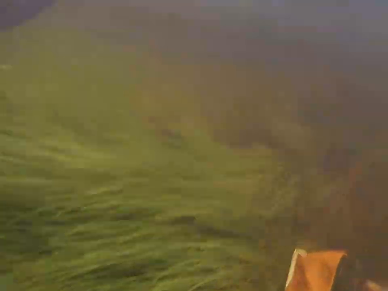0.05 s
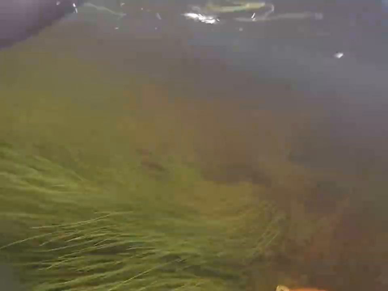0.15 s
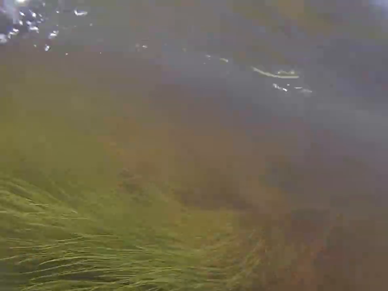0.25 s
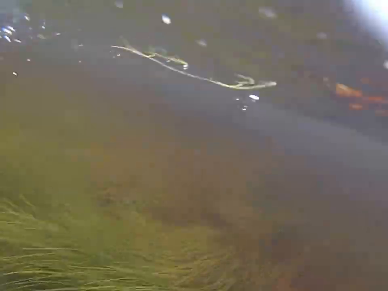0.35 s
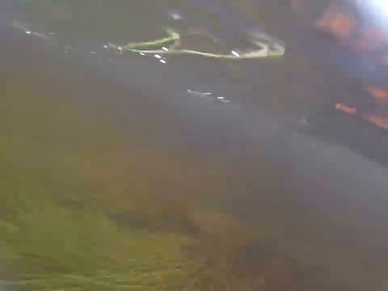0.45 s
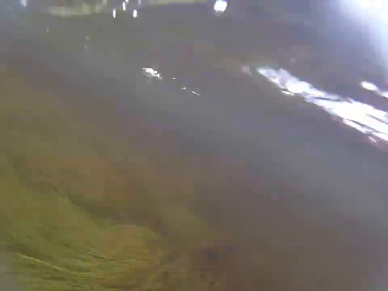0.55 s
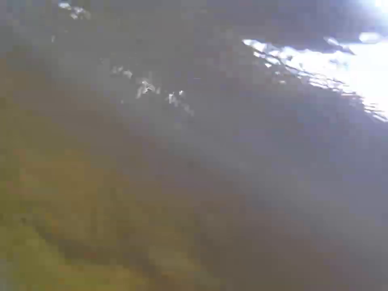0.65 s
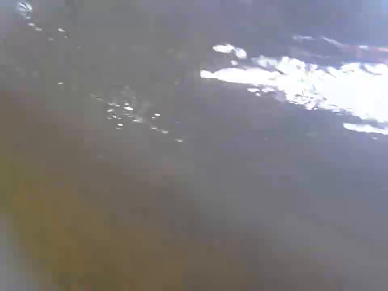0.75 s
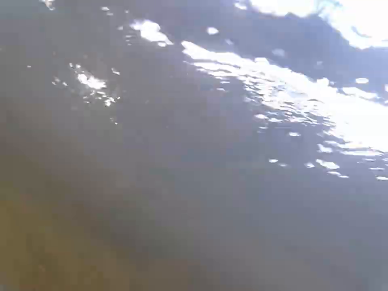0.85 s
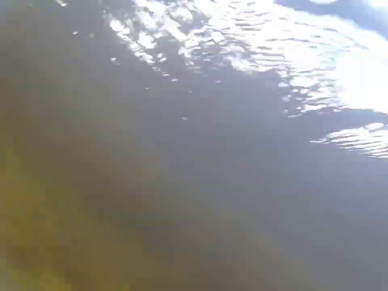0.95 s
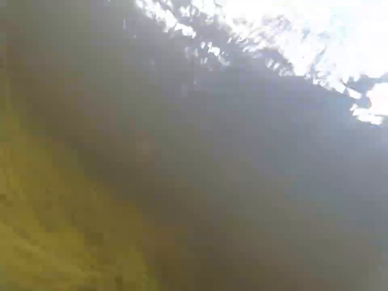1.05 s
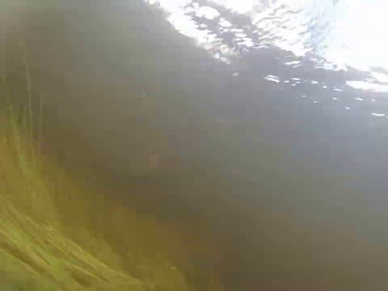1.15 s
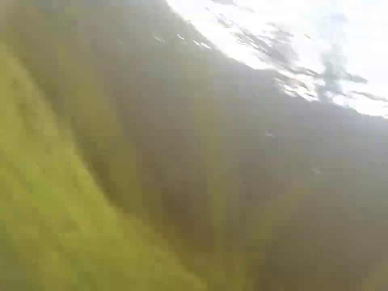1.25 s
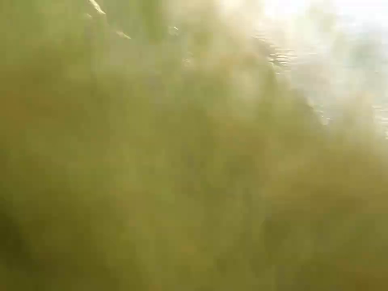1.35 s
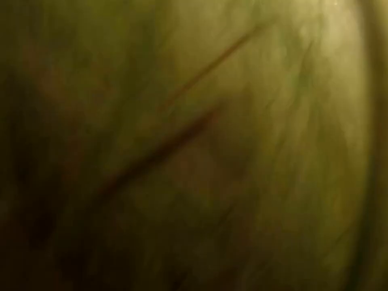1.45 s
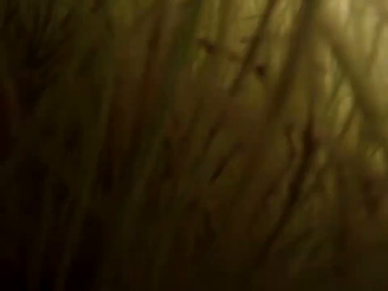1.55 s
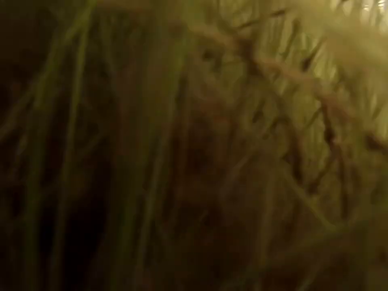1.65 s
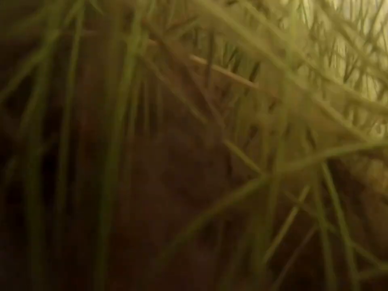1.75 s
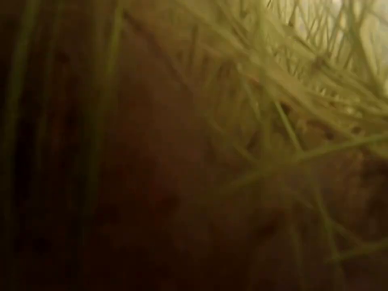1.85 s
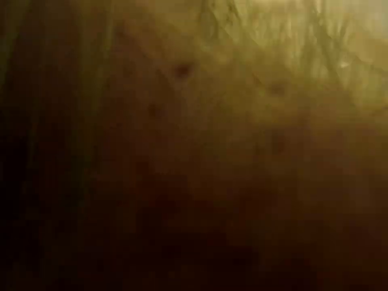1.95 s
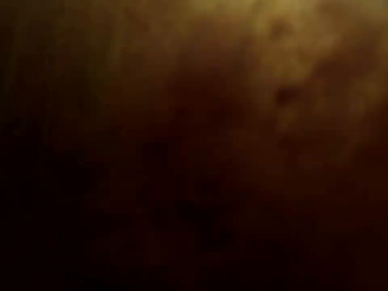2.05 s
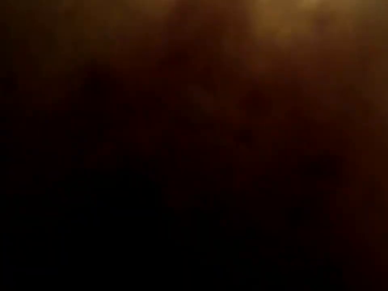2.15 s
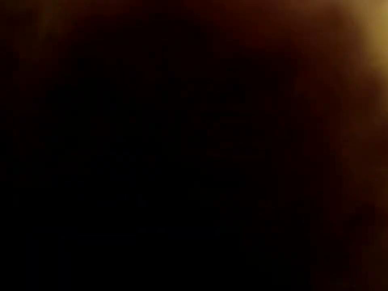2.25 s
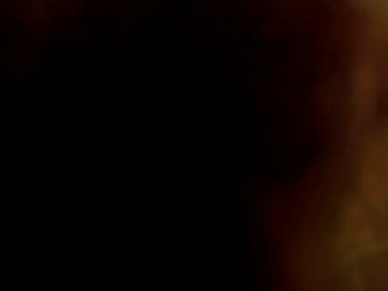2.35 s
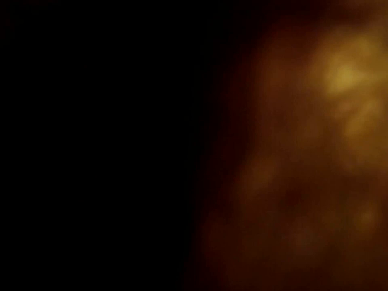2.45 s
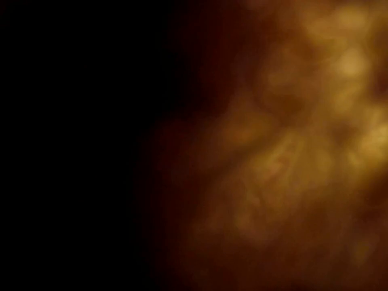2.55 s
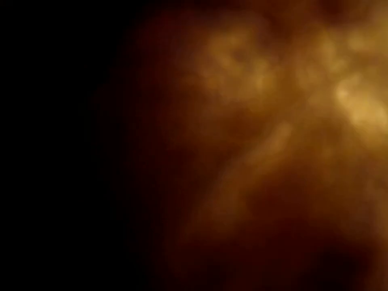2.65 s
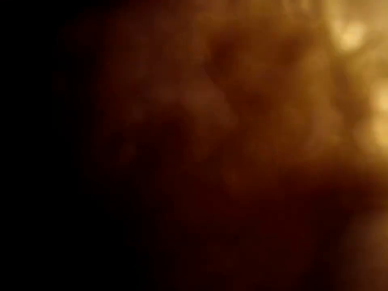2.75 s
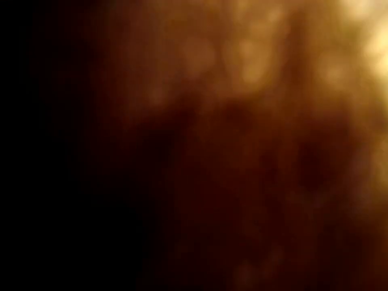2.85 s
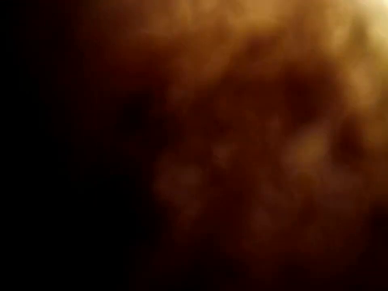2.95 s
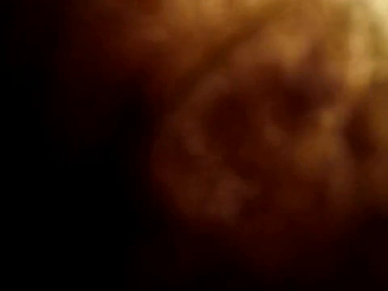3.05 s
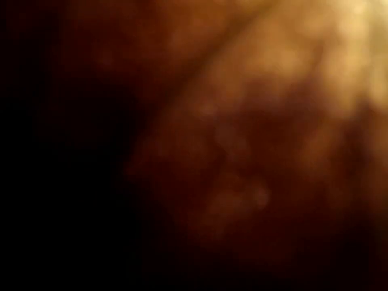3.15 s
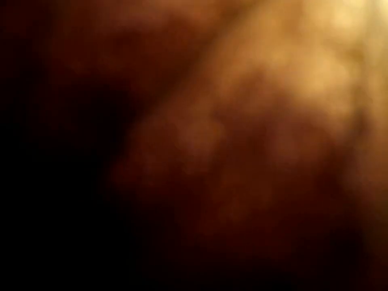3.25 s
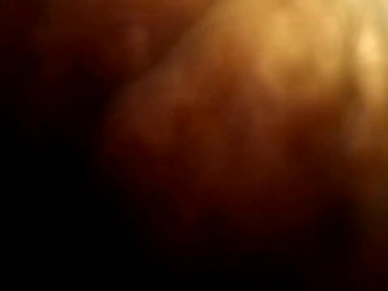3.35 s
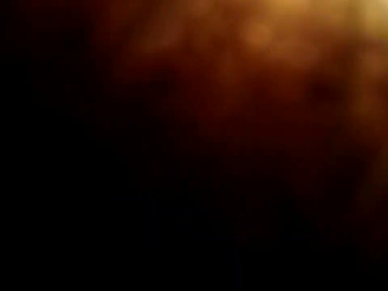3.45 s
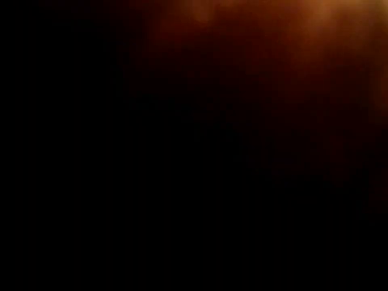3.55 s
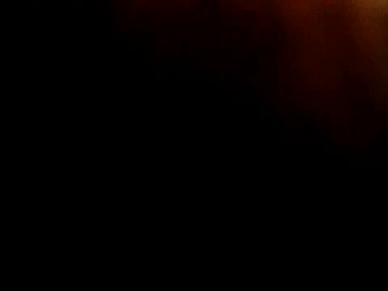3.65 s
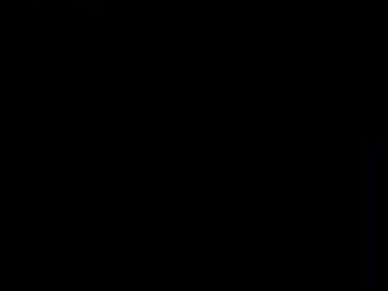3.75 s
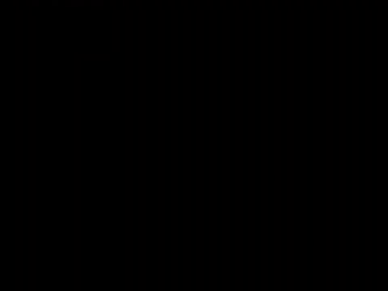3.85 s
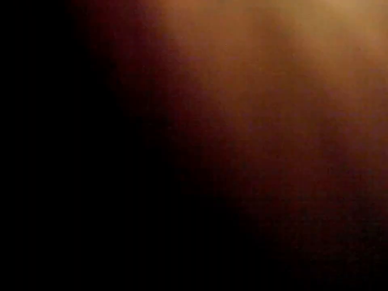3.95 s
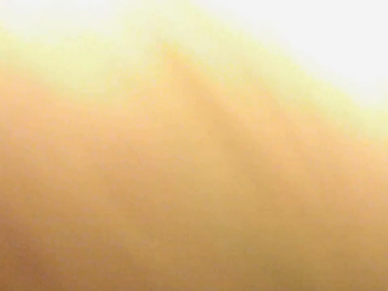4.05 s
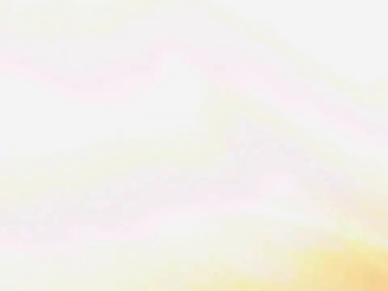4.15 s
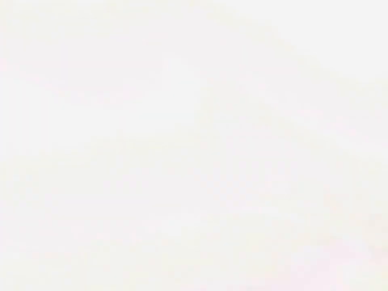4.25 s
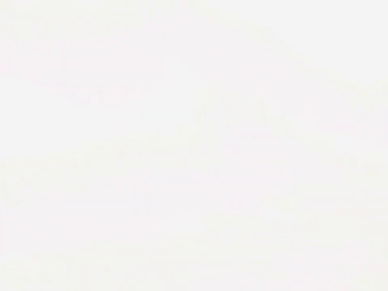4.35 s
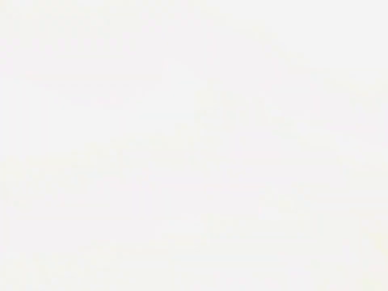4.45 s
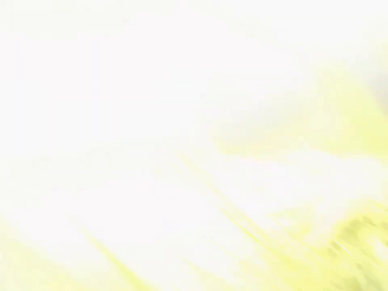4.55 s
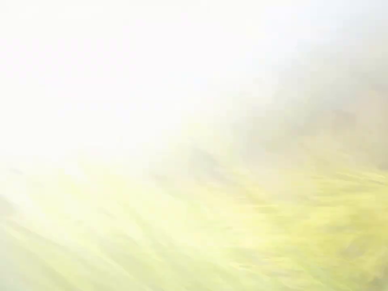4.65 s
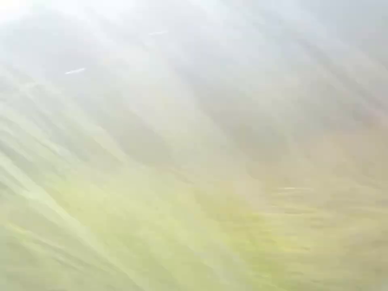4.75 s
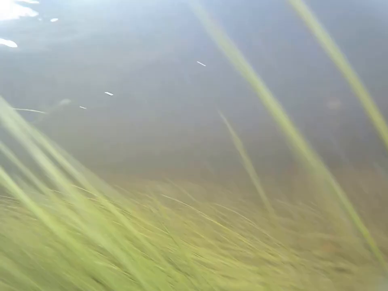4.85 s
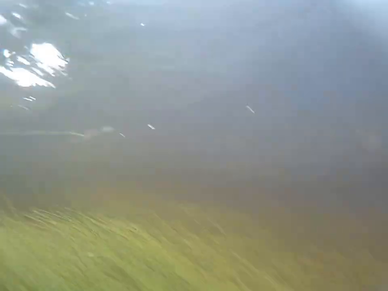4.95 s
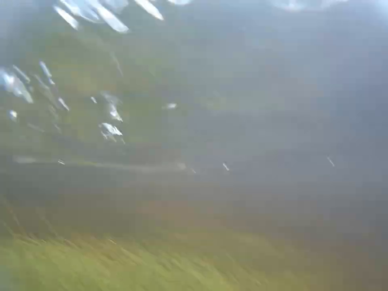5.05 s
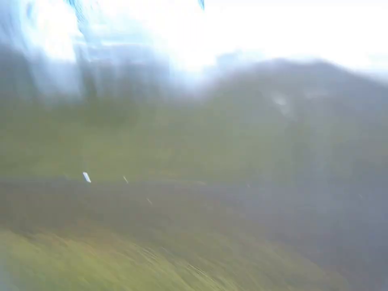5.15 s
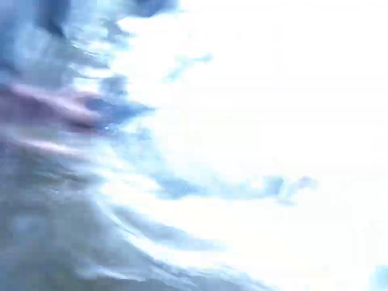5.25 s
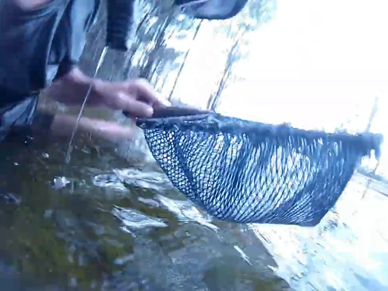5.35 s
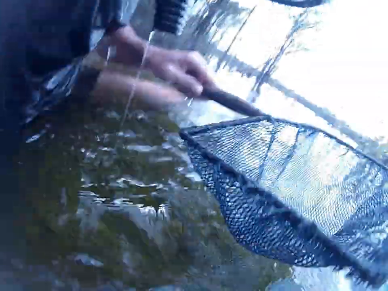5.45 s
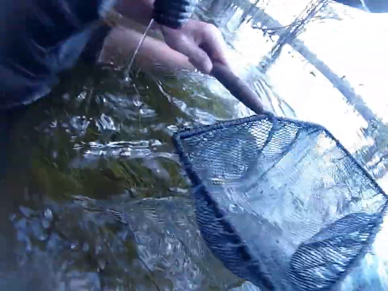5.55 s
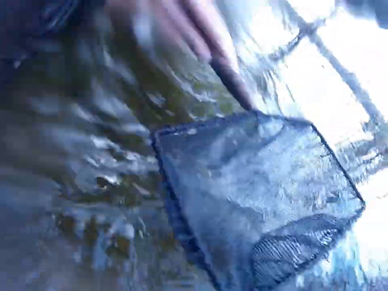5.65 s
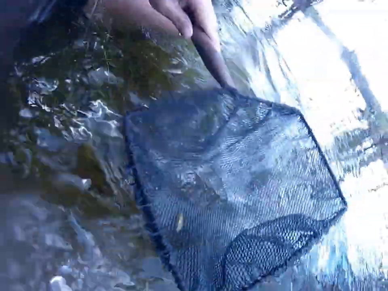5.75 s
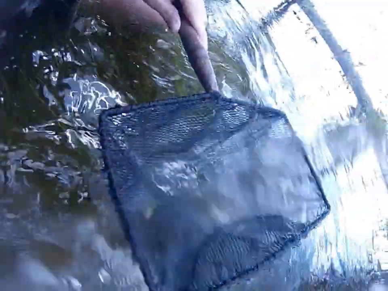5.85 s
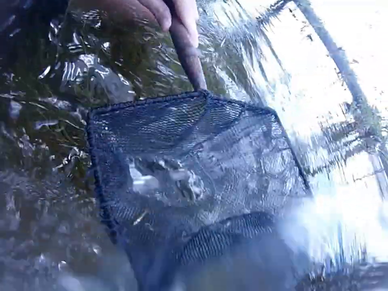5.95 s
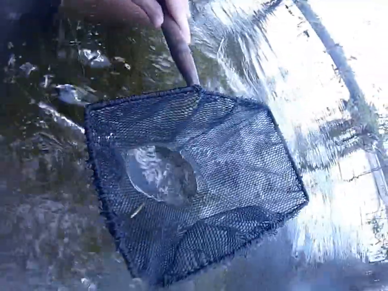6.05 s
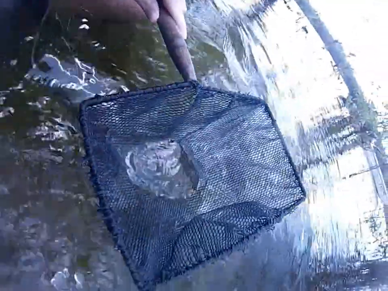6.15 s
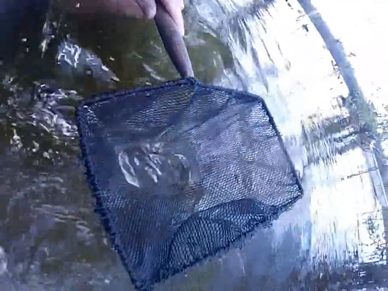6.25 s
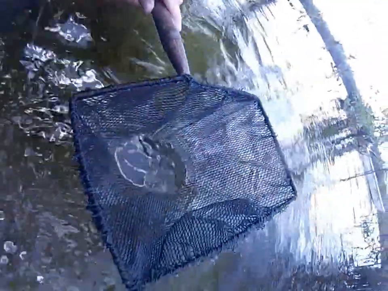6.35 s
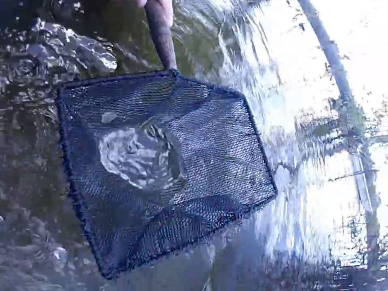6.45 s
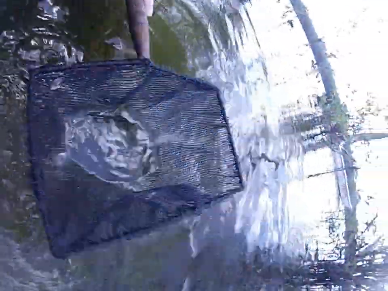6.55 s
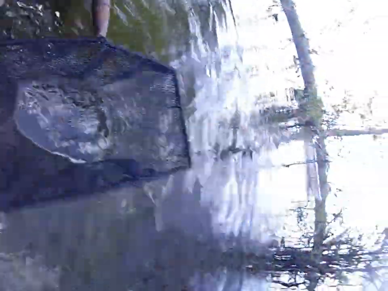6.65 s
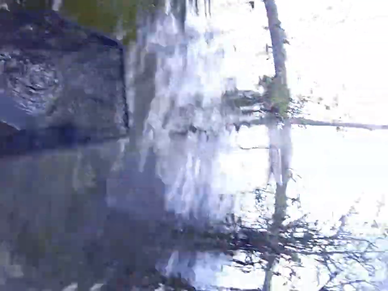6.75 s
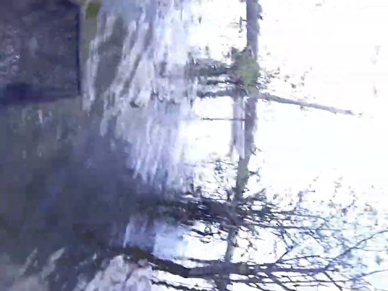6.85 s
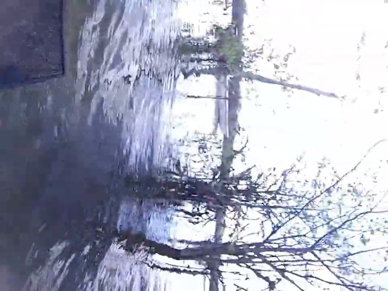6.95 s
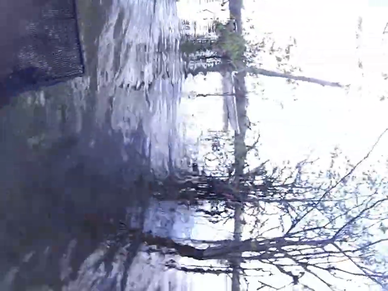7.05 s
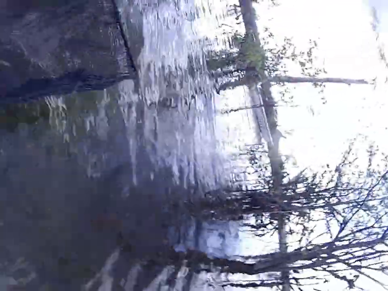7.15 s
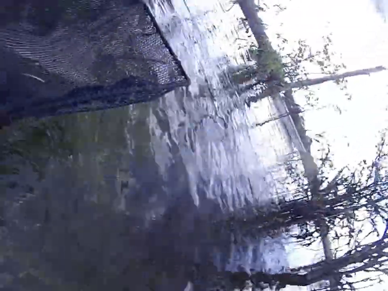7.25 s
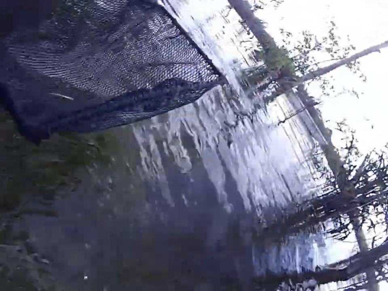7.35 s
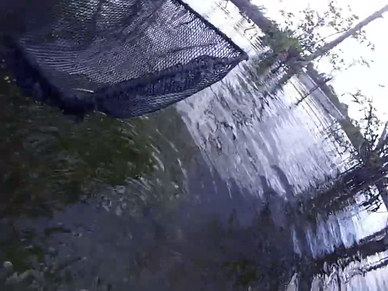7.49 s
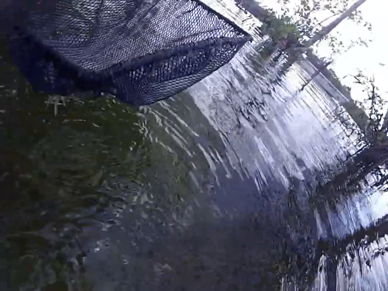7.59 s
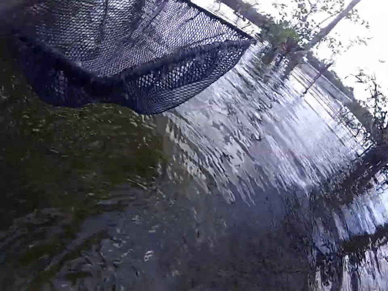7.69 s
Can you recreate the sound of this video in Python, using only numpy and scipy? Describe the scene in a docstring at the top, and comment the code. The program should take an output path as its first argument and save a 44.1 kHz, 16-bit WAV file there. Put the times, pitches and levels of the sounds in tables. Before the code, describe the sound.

A cased microphone gurgles loudly through stream water, rustles quietly among weeds, surfaces with thumps, then gets rubbed and sharply knocked while water drips.

```python
"""Cased camera in a stream

A camera in a waterproof case is pushed through a stream beside a hand net, then lifted out.
Under water, ringing sines make bubbles, dense swarms make gulps, and rough noise makes weed and fingers.
In the air, fingers rub the case and blows ring its shell, crack and thud; the net drips, electronics tick.
The closed case makes all this mono at the microphone, which the hardest knocks and bubbles overload."""
import sys
import numpy as np
from scipy import signal
from scipy.fft import rfft, irfft, next_fast_len
from scipy.io import wavfile
from scipy.ndimage import uniform_filter1d

SR = 44100
rng = np.random.default_rng(int(sys.argv[2]) if len(sys.argv) > 2 else 0)


def put_to_file(sound):
    """Save the sound as 16-bit audio at rate SR, in the file named by the first command-line argument."""
    columns = np.atleast_2d(sound).T  # one column per channel
    safe = np.clip(columns, -1, 1)
    whole_steps = np.round(safe * 32767)
    wavfile.write(sys.argv[1], SR, whole_steps.astype(np.int16))


N = 340452
TIME = np.arange(N) / SR


def from_db(db):
    """Amplitude ratio of a level in dB."""
    return 10 ** (np.asarray(db) / 20)


def rms_one(x):
    """Scale to an rms of 1."""
    return x / np.sqrt(np.mean(x ** 2) + 1e-20)


def evened(x, window_s):
    """Hold the short-term level of a texture near 1."""
    return x / np.sqrt(uniform_filter1d(x ** 2, int(window_s * SR)) + 1e-4)


def level(rows):
    """Gain that follows rows of (t/s, level/dB), silent outside them."""
    rows = np.array(rows)
    return from_db(np.interp(TIME, rows[:, 0], rows[:, 1], left=-150, right=-150))


def swells(rows, attack_s, release_s):
    """Gain of events (start, length, dB) that rise, hold and die away; overlaps add in power."""
    power = np.zeros(N)
    for s, length, db in rows:
        away = np.maximum((s - TIME) / attack_s, (TIME - s - length) / release_s)
        power += (from_db(db) * np.exp(-np.clip(away, 0, 20))) ** 2
    return np.sqrt(power)


def at_hz(points, hz):
    """Read a spectrum on a log-frequency axis."""
    points = np.array(points)
    return np.interp(np.log(hz), np.log(points[:, 0]), points[:, 1])


def low_pass(x, hz, order=2):
    """Butterworth low-pass."""
    return signal.sosfilt(signal.butter(order, hz, "low", fs=SR, output="sos"), x + 1e-18)


def add(out, s, sound):
    """Mix a sound in from time s."""
    start = max(int(s * SR), 0)
    out[start:start + len(sound)] += sound[:max(N - start, 0)]


def drift(rate):
    """Random wander with spread 1, through a new chance value rate times a second."""
    knots = rng.standard_normal(4000)
    return rms_one(np.interp(TIME * rate, np.arange(len(knots)), knots))


def coloured(x, spectrum):
    """Give x a spectrum that falls away steeply beyond its ends; rms 1."""
    size = next_fast_len(N)
    hz = np.maximum(np.arange(size // 2 + 1) * SR / size, 1)
    low_skirt = np.minimum(hz / spectrum[0][0], 1) ** 4
    high_skirt = np.minimum(spectrum[-1][0] / hz, 1) ** 4
    gain = from_db(at_hz(spectrum, hz)) * low_skirt * high_skirt
    return rms_one(irfft(rfft(x, size) * gain, size)[:N])


def friction(spectrum, grain_db, flutter_db):
    """Countless tiny slips of uneven size, coming in flurries."""
    grains = np.repeat(rng.standard_normal(N // 16 + 1), 16)[:N]
    slips = rng.standard_normal(N) * from_db(grain_db * grains)
    return coloured(slips * from_db(flutter_db * drift(120)), spectrum)


def ring(clicks, hz, t60):
    """A unit click sets a sine of height 1 ringing."""
    r = from_db(-60 / (t60 * SR))
    w = 2 * np.pi * hz / SR
    return signal.lfilter([0, np.sin(w)], [1, -2 * r * np.cos(w), r * r], clicks + 1e-18)


def swarm(colour, per_s, cycles, spread_db, count=40):
    """Random pulses, each swelling quickly and ringing some cycles at one of count pitches; rms 1."""
    born = rng.random(N) < per_s / SR
    uneven = from_db(spread_db * np.minimum(rng.exponential(1, N), 2))
    sizes = born * uneven * rng.choice([-1, 1], N)
    dealt = rng.integers(0, count, N)
    out = np.zeros(N)
    for k, hz in enumerate(np.geomspace(colour[0][0], colour[-1][0], count)):
        onset = ring(sizes * (dealt == k), hz, 3 / hz)
        out += from_db(at_hz(colour, hz)) * hz ** 2 * ring(onset, hz, cycles / hz)
    return rms_one(out)


def hiss_pair():
    """A trace of independent steady noise in each channel."""
    spectrum = [(20, 24), (100, 11), (400, 0.0), (2500, -3.0), (7000, 0), (14000, -9)]  # f/Hz, level/dB
    return from_db(-73) * np.array([coloured(rng.standard_normal(N), spectrum) for side in "LR"])


def stream():
    """Steady noise of the stream, weaker towards the treble."""
    # spectrum of the flow: f/Hz, relative level/dB
    stream_spectrum = [(80, 4), (150, -8.5), (330, -7.5), (640, -11.5), (1000, -14.5), (1400, -17),
                       (2200, -20.5), (3700, -24.5), (7000, -29.5), (12300, -35.5), (16000, -36.5)]
    return from_db(-56.5) * coloured(rng.standard_normal(N), stream_spectrum)


def ticks(tick_db=-35, width_s=0.00159, edge_hz=2500):
    """The camera's radio draws current in short square bursts, about ten a second."""
    start_s, period_s = 7.0555, .1024
    gate = ((TIME - start_s) % period_s < width_s) & (TIME > start_s)
    return -from_db(tick_db) * low_pass(1.0 * gate, edge_hz, order=1)


def buffeting(trim_db=0.5):
    """Flow and handling buffet the case: low rumble of uneven strength."""
    # strength of the buffeting, before the trim: t/s, level/dB
    buffet_rows = [(0.0, -45), (0.13, -37.5), (0.36, -44.5), (0.97, -23.5), (1.48, -30), (1.57, -22.5),
                   (1.63, -39), (3.83, -33.5), (3.98, -23), (4.62, -39.5), (5.12, -45.5), (5.27, -24.5),
                   (5.7, -30.5), (5.78, -39.5), (6.04, -33), (7.01, -34), (7.1, -43.5), (7.72, -58.5)]
    # spectrum of the rumble: f/Hz, relative level/dB
    rumble_spectrum = [(12, -10.5), (20, 1), (30, -4.5), (50, -13.5), (80, -24), (140, -27), (250, -37),
                       (500, -65.5)]
    rumble = evened(coloured(rng.standard_normal(N), rumble_spectrum), window_s=0.034)
    return from_db(trim_db) * level(buffet_rows) * rumble


def trickle():
    """A thin swarm of small bubbles and drips, each a short ring."""
    # strength of the trickle: t/s, level/dB
    trickle_rows = [(0, -57.5), (.6, -59), (1.3, -61.5), (2.8, -66), (4.2, -43), (5.0, -64), (5.7, -51.5),
                    (7.72, -72)]
    # weight of the drip pitches: f/Hz, relative level/dB
    trickle_spectrum = [(750, 13.5), (1000, -5.5), (2100, 0.5), (2900, -15.5), (3800, -14.5), (5500, -23)]
    return swarm(trickle_spectrum, per_s=130, cycles=28, spread_db=6) * level(trickle_rows)


def spray():
    """As the case breaks the surface, a dense swarm of small rings swells and fades."""
    # strength of the spray: t/s, level/dB
    spray_rows = [(.58, -50), (.7, -43.5), (.88, -32), (.97, -25), (1.08, -33.5), (1.25, -51), (1.36, -64)]
    # weight of the spray pitches: f/Hz, relative level/dB
    spray_spectrum = [(900, 6), (1300, 9.5), (1800, 4.5), (2300, 6.5), (2900, -19), (3800, -11),
                      (5000, -29.5), (8000, -29), (11000, -67)]
    drops = swarm(spray_spectrum, per_s=1100, cycles=28, spread_db=6)
    return evened(drops, window_s=.04) * level(spray_rows)


def sheeting():
    """Water sheets over the case as fluttering noise."""
    # the plunge: t/s of the start, length/s, level/dB
    plunge_rows = [(.635, 0.073, -39)]
    spectrum = [(150, 7.0), (500, 6.0), (1400, 6.0), (2300, 5.0), (3500, -4), (4800, -15.5),
                (6200, -15.5), (9000, -25.5), (14000, -44.5)]  # f/Hz, relative level/dB
    sheet = friction(spectrum, grain_db=1.0, flutter_db=4.0)
    return sheet * swells(plunge_rows, attack_s=0.036, release_s=.22)


def cloud(colour):
    """Large bubbles born so fast that they merge into one boiling note."""
    return evened(swarm(colour, per_s=560, cycles=65, spread_db=2), window_s=.03)


def gulps():
    """Two clouds of air shaken loose under water; the second lingers."""
    # each cloud: t/s of the start, length/s, level/dB
    gulp_rows = [(1.06, 0.13, -16.5)]
    gurgle_rows = [(1.73, .06, -24)]
    # weight of the pitches in each cloud: f/Hz, relative level/dB
    gulp_spectrum = [(200, -8.5), (320, -26), (400, 0), (470, 5.5), (530, -3.5), (610, 5), (690, 7.5),
                     (780, -14), (900, -3.5), (1100, -26)]
    gurgle_spectrum = [(240, -20), (310, -9.5), (390, -0.5), (480, -9), (580, 1.5), (650, -7), (720, -29.5),
                       (920, -18.5)]
    gulp = cloud(gulp_spectrum) * swells(gulp_rows, attack_s=0.11, release_s=0.053)
    burst = swells(gurgle_rows, attack_s=0.032, release_s=0.025)
    tail = from_db(-4.5) * swells(gurgle_rows, attack_s=0.03, release_s=0.27)
    return gulp + cloud(gurgle_spectrum) * np.hypot(burst, tail)


def brushing():
    """Weed and fingers slide on the submerged case; stems and grit tap harder when brushed harder."""
    # strokes of weed and fingers: t/s of the start, length/s, level/dB
    brush_rows = [(1.40, .17, -39), (1.70, 0.18, -48), (1.9, 0.42, -54.5), (2.4, 2, -57),
                  (2.82, 0.024, -56), (3.41, 0.036, -46.5), (3.72, 0.17, -43.5), (3.96, 0.063, -39.5),
                  (4.05, 0.051, -33), (4.2, 0.25, -46), (4.42, 0.41, -43.5)]
    # spells of tapping, before the brushing scales them: t/s of the start, length/s, level/dB
    tap_rows = [(2.78, 1.29, -34), (3.73, 0.053, -29.5)]
    # spectra of scrape, hiss and tap pitches: f/Hz, relative level/dB
    scrape_spectrum = [(130, -1), (300, -1), (430, -3), (590, 6), (850, -4.5), (1150, -7.5), (1480, 0),
                       (1750, -9), (2200, -1), (2900, -19), (3650, -11), (4300, -22)]
    hiss_spectrum = [(4200, -11), (4900, -7), (5800, -11), (7400, -7.5), (8900, -19.5), (10800, -15),
                     (12800, -16), (15000, -29)]
    tap_spectrum = [(160, 10), (350, 13.5), (580, 16.5), (900, 15), (1150, -45), (1500, 12), (2100, -15),
                    (2900, -1.5), (3700, -28), (7000, -43)]
    rub = swells(brush_rows, attack_s=0.028, release_s=0.056)
    scrape = rub * friction(scrape_spectrum, grain_db=4, flutter_db=2.0)
    # the hiss grows faster than the scrape, so a stronger rub is brighter
    hiss = from_db(-6.0) * rub ** 1.242 * friction(hiss_spectrum, grain_db=3.0, flutter_db=2.5)
    tapping = evened(swarm(tap_spectrum, per_s=200, cycles=10, spread_db=5, count=24), window_s=.12)
    follow = rub ** 0.24  # taps take this share of the brushing level in dB
    return scrape + hiss + tapping * follow * swells(tap_rows, attack_s=0.045, release_s=.04)


def squeaks():
    """A finger sings on the wet case: noise excites one narrow resonance."""
    # each squeak: t/s of the start, length/s, level/dB
    squeak_rows = [(4.522, 0.075, -42), (4.65, 0.029, -44.5), (4.785, 0.095, -48.5)]
    tone = evened(rms_one(ring(rng.standard_normal(N), 1870, 0.056)), window_s=0.09)
    return tone * swells(squeak_rows, attack_s=0.059, release_s=0.02)


def creaks():
    """The grip shifts and creaks in a dense swarm of dull slips."""
    # each creak: t/s of the start, length/s, level/dB
    creak_rows = [(6.577, .005, -19), (6.6, 0.054, -30.5), (6.74, 0.086, -37)]
    # weight of the creak pitches: f/Hz, relative level/dB
    grip_spectrum = [(110, 11), (210, 8.5), (300, -10), (380, -0.5), (470, 8), (600, -7), (900, -18),
                     (1800, -22)]
    creak = evened(swarm(grip_spectrum, per_s=800, cycles=9, spread_db=4, count=16), window_s=.03)
    return creak * swells(creak_rows, attack_s=0.0022, release_s=0.013)


def rubs(sing_db=-3, sing_t60_s=.004):
    """In the air, fingers swish over the shell, each stroke half singing at its own pitch."""
    # finger strokes: t/s of the peak, level/dB of the swish, swell/s, fade/s, f/Hz of the singing
    rub_rows = [(5.224, -43, 0.031, 0.019, 1860), (5.406, -36.5, 0.05, 0.039, 2110),
                (5.605, -38.5, 0.019, .022, 2180), (5.78, -54, .02, 0.013, 1960),
                (5.939, -36.5, .0063, 0.029, 2230), (6.028, -26.5, .015, 0.027, 2500),
                (6.053, -16, 0.0075, 0.005, 1010), (6.091, -34, 0.018, 0.023, 2400),
                (6.185, -30.5, 0.0039, 0.0063, 2000), (6.298, -45, 0.014, 0.014, 2190),
                (6.369, -45, 0.02, 0.1, 1410), (6.477, -32, .023, 0.039, 2400),
                (6.66, -38, 0.017, 0.044, 2340), (6.908, -31.5, 0.018, 0.013, 4300),
                (7.003, -35, 0.053, 0.0078, 1470)]
    shell = [(150, 5.5), (400, 4.5), (700, 1.0), (950, 5), (1400, 3.5), (1800, 0), (2350, 2), (3100, -11),
             (4600, -8.5), (6500, -19.5), (9000, -45), (11000, -35), (15000, -49)]  # f/Hz, relative level/dB
    slips = friction(shell, grain_db=-1, flutter_db=5.5)
    dull_noise = low_pass(rng.standard_normal(N), 4500)
    out = np.zeros(N)
    for s, db, swell, fade, hz in rub_rows:
        singing = from_db(sing_db) * rms_one(ring(dull_noise, hz, sing_t60_s))
        out += swells([(s, 0, db)], swell, fade) * (slips + singing)
    return out


def bubble(hz, db, t60, rise, pinch_cycles=0.69):
    """A bubble pinches off within a cycle, then rings down, its pitch shifting as it nears a surface."""
    t = np.arange(int(t60 * SR)) / SR
    phase = 2 * np.pi * np.cumsum(hz * 2 ** (rise * t / t60)) / SR
    swell = 1 - np.exp(-t * hz / pinch_cycles)
    return -from_db(db) * swell * np.exp(-np.log(1000) * t / t60) * np.sin(phase)


def loud_bubbles():
    """The loudest single bubbles, each a decaying sine."""
    # t/s, f/Hz, level/dB before swell and decay, t60/s, pitch rise per t60/octaves
    bubble_rows = [(.065, 1300, -39, .031, 0), (0.182, 665, -27.5, 0.13, 0.17),
                   (.293, 1640, -41.5, .043, .15), (.379, 935, -30.5, 0.07, 0.3),
                   (.38, 1635, -36.5, 0.044, 0), (0.553, 894, -37.5, 0.1, 0.2),
                   (.709, 6040, -14.5, 0.0043, -0.2), (0.7369, 838, -1.5, 0.022, -0.06),
                   (0.768, 645, 10.5, 0.0041, 0), (0.767, 1374, -11, 0.045, .5),
                   (.779, 1910, -12, 0.019, 0.3), (0.7957, 582, -5.5, 0.067, 0.1),
                   (.812, 823, 7.5, .011, 0.4), (.8166, 2085, -4.5, 0.017, -0.07),
                   (0.8606, 758, 11, 0.0079, 0), (.9255, 2090, -13, .024, 0.15),
                   (0.935, 396, -8.5, 0.18, 0.19), (.9564, 2290, 6.5, 0.0072, .45),
                   (.969, 620, -7, 0.056, 0.25), (1.004, 520, -10.5, 0.31, 0.05),
                   (1.0205, 596, -12, 0.024, -0.3), (1.0707, 1400, -0.5, 0.0064, -0.3),
                   (1.107, 680, -16, 0.083, 0), (1.1425, 740, -9, 0.026, -0),
                   (1.316, 842, -18.5, .083, 0.17), (1.611, 670, -10, 0.0081, 0.1),
                   (1.694, 863, -27.5, 0.054, 0.13), (2.051, 887, -30.5, 0.091, 0.4),
                   (2.113, 913, -33.5, .08, 0.46), (2.61, 1480, -40, 0.047, 0.2),
                   (2.853, 1300, -31.5, 0.017, 0.3), (3.024, 1640, -31.5, .013, -0.2),
                   (3.42, 2190, -35.5, 0.043, -.1), (3.443, 925, -35, .051, 0.1),
                   (3.088, 935, -26.5, 0.031, 0.3), (3.112, 844, -23.5, 0.023, 0.8),
                   (3.511, 1860, -22.5, 0.018, .15), (4.114, 3780, -33, 0.061, -0.03),
                   (4.138, 1940, -12.5, 0.012, -0.3), (4.312, 569, -19.5, 0.16, 0.32),
                   (4.324, 775, -20, 0.14, -0.8), (4.777, 1870, -26, 0.084, -0.05),
                   (4.903, 847, -16, 0.11, -0.12), (5.163, 1400, -40, 0.16, -0.16),
                   (5.202, 1730, -14.5, .016, 0.3), (5.686, 1210, -38.5, 0.076, -0.3),
                   (7.598, 3430, -32, 0.0063, 0.05)]
    out = np.zeros(N)
    for s, hz, db, t60, rise in bubble_rows:
        add(out, s, bubble(hz, db, t60, rise))
    return out


def stray_bubbles(start_s=1.9, pass_s=1.75, count=13, low_hz=716, high_hz=2400, cycles=55):
    """Faint bubbles slip out of the weed at random, all ringing for the same number of cycles."""
    out = np.zeros(N)
    for k, (when, size, strength) in enumerate(rng.random((count, 3))):
        hz = low_hz * (high_hz / low_hz) ** (size ** 2)
        db = -40.5 - 2.5 * (2 * strength - 1)
        s = start_s + (k + when) * pass_s / count
        add(out, s, bubble(hz, db, cycles / hz, rise=0.15))
    return out


def blow(ring_db, crack_db, thud_db, thud_s, crack_s=0.0011, crack_hz=6500, mode_spread_db=2):
    """A blow cracks, rings the shell and squeezes the air inside: one swing down and a smaller one back."""
    # modes of the case, strength varying from blow to blow: f/Hz, mean relative level/dB, t60/s
    case_modes = [(520, -10.5, 0.016), (774, -5, 0.0057), (1057, -5, 0.013), (1400, -5, 0.0091),
                  (2194, 0, 0.0065), (2373, -8.5, 0.0074), (3590, -21.5, 0.013), (4750, -22.5, 0.008)]
    t = np.arange(SR // 8) / SR
    strengths = from_db(mode_spread_db * rng.standard_normal(len(case_modes)))
    shell = np.zeros(len(t))
    for k, (strength, (hz, db, t60)) in enumerate(zip(strengths, case_modes)):
        decay = np.exp(-np.log(1000) * t / t60)
        shell += strength * from_db(db) * decay * np.sin(2 * np.pi * hz * t) * (-1) ** k
    crack = low_pass(rng.standard_normal(len(t)), crack_hz) * np.exp(-t / crack_s)
    age = t / thud_s
    thud = -1.9 * np.sin(np.pi * age / 1.2) * np.exp(-1.2 * age) * np.minimum(age * 4, 1)
    return from_db(ring_db) * shell + from_db(crack_db) * crack + from_db(thud_db) * thud


def bumps():
    """Soft bumps of the hand mostly thud, with a little ring and crack."""
    # t/s, level/dB of the thud, thud length/s
    bump_rows = [(.629, -22, 0.003), (2.364, -29, 0.0026), (3.405, -20, 0.0024), (4.087, -19, 0.0092),
                 (5.245, -11, 0.011), (5.31, -4, 0.0073), (5.439, -13, 0.014), (5.601, -15, 0.0081),
                 (6.644, -14.5, 0.0054), (6.769, -15, 0.0037), (6.796, -16.5, 0.0083), (6.98, -17, 0.0082)]
    out = np.zeros(N)
    for s, db, length in bump_rows:
        add(out, s, blow(db - 17.5, db - 44, db, length))
    return out


def clicks_on_shell():
    """Grit and drops click on the shell: a crack above a weaker ring and thud."""
    # t/s, level/dB of the crack
    click_rows = [(1.837, -30), (2.145, -27), (2.8216, -26.5), (3.705, -33.5), (3.801, -27.5), (3.863, -34),
                  (5.202, -21.5), (5.2726, -28), (5.282, -23.5), (5.313, -18), (5.345, -30.5)]
    out = np.zeros(N)
    for s, db in click_rows:
        add(out, s, blow(db - 4, db, db - 4, 0.0008, crack_s=0.00043, crack_hz=10200))
    return out


def knocks():
    """Hard knocks ring, crack and thud the case in varying shares."""
    # t/s, ring level/dB, crack level/dB, thud level/dB, thud length/s
    knock_rows = [(0.7365, -13, -4.5, -9, .0007), (0.8162, -17, -37, -0.5, 0.0005),
                  (1.0676, -8, -27, -24, 0.00175), (5.9224, 11, 2, 13, 0.00072),
                  (5.959, -8, -19, -12, 0.0031), (6.057, 10, 4, -.5, 0.0029), (6.197, 0, -28, 2, 0.0027),
                  (6.498, -18.5, -44, -10.5, 0.0017), (6.9202, 4, -26, 9.5, 0.00091)]
    out = np.zeros(N)
    for s, ring_db, crack_db, thud_db, thud_s in knock_rows:
        add(out, s, blow(ring_db, crack_db, thud_db, thud_s, crack_s=0.00013, crack_hz=5500))
    return out


def scene():
    """The closed case makes everything mono, save a trace of hiss."""
    background = stream() + ticks() + buffeting()
    water = trickle() + spray() + sheeting() + gulps() + loud_bubbles() + stray_bubbles()
    touch = brushing() + squeaks() + creaks() + rubs()
    contacts = bumps() + clicks_on_shell() + knocks()
    return background + water + touch + contacts + hiss_pair()


def record(dry, knee=8, top_hz=10000, cutoff_hz=16400):
    """The microphone overloads on the loudest peaks; the treble rolls off and the top is cut."""
    limited = dry / (1 + np.abs(dry) ** knee) ** (1 / knee)
    dulled = low_pass(limited, top_hz, order=1)
    return signal.sosfilt(signal.cheby2(12, 70, cutoff_hz, fs=SR, output="sos"), dulled)


dry = scene()
out = record(dry)
put_to_file(out)
```